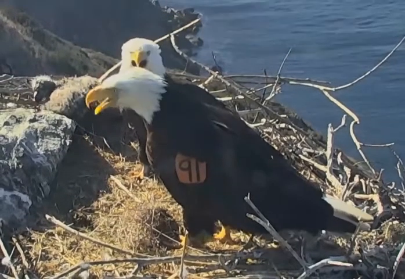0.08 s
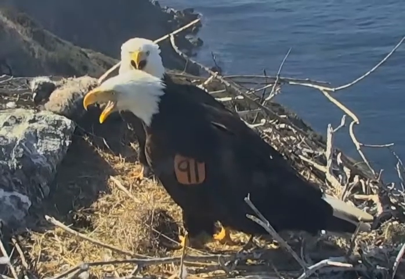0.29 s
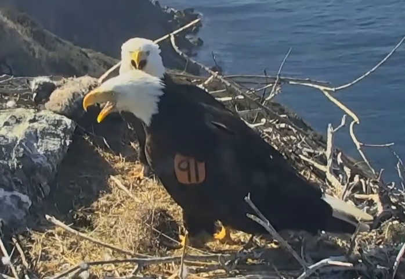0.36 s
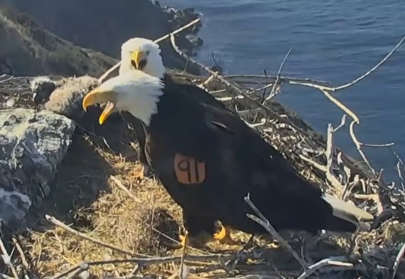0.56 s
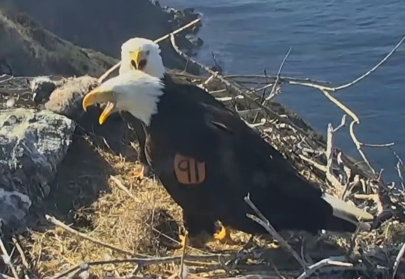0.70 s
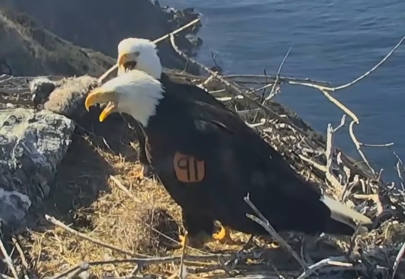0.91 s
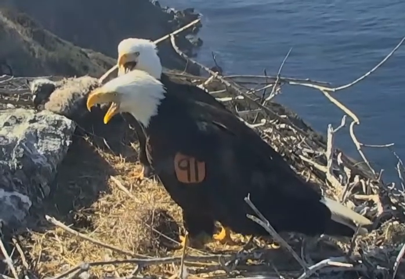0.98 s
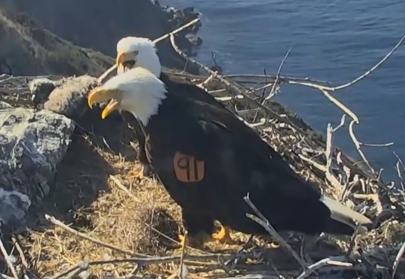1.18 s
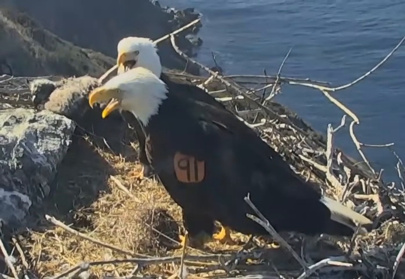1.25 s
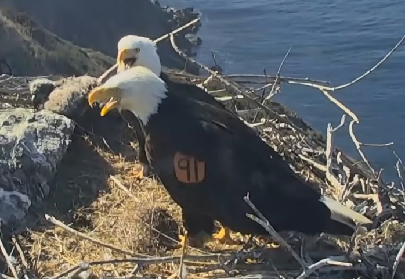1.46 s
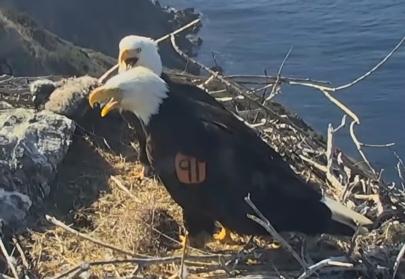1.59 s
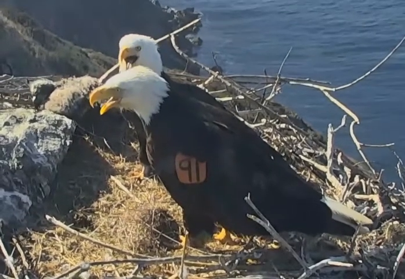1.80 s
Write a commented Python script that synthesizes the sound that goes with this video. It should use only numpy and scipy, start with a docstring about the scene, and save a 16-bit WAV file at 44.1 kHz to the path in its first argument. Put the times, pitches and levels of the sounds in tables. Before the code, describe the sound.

An eagle gives shrill, high-pitched yelps that weaken, over steady wind and distant surf.

```python
"""A cliff nest above the sea, a small microphone close to a yelping eagle, steady wind and surf behind.
Each yelp is a nearly pure whistle, most led in by a quick downward squeak; the series fades into weak,
cracked notes. Sticks and rock scatter a faint tail. At this distance the loud notes overload the
microphone, which turns them shrill and thumps after the two hardest; the sound cuts out once."""
import sys
import numpy as np
from scipy import signal
from scipy.fft import rfft, irfft
from scipy.io import wavfile
from scipy.ndimage import uniform_filter1d

SR = 44100
rng = np.random.default_rng(int(sys.argv[2]) if len(sys.argv) > 2 else 0)


def wrap_up_sound(samples):
    """Save the sound to the file named by the first command line argument, as 16-bit audio."""
    columns = np.atleast_2d(samples).T
    # keep every value between -1 and 1, then stretch to whole-number steps
    tamed = np.clip(columns, -1, 1)
    steps = np.round(tamed * 32767).astype(np.int16)
    wavfile.write(sys.argv[1], SR, steps)


N = 81585

RASP_HZ = 550  # how fast the voice wavers in pitch and level
CLIP_DB = -26  # ceiling of the microphone


def yelps(t):
    """The eagle, close up: arched, quivering whistles that crack to half the pitch as the voice weakens."""
    # One yelp a row: (start [s], attack [s], hold [s], release [s], pitch at the start [Hz],
    # after the attack [Hz], after the hold [Hz], at the end [Hz], level [dB],
    # octave [dB re the whistle], undertone [dB re the whistle], rasp [0-1])
    notes = [ (.227, 0.021, 0.026, 0.048, 2670, 2847, 2840, 2496, -19.5, -25, -70.5, 0),
             (0.348, 0.0084, .025, .028, 3520, 3575, 3600, 3330, -18.5, -8.5, -59.5, 0.06),
             (.4665, .007, .009, .011, 2800, 2970, 2945, 2820, -22, -28, -24, .1),
             (.487, .009, .007, .025, 3780, 3690, 3560, 3430, -18.5, -13, -45, .12),
             (0.8748, 0.0036, 0.03, 0.012, 2790, 2872, 2850, 2670, -22, -29.5, -53.5, 0.15),
             (1, 0.0056, 0.024, 0.017, 2747, 2835, 2780, 2740, -23, -25, -58, 0),
             (1.131, 0.0049, 0.0093, 0.014, 2800, 2830, 2780, 2660, -24, -29.5, -48.5, 0),
             (1.146, .006, .006, .019, 2730, 2715, 2700, 2620, -32, -26, -15, .04),
             (1.257, 0.0067, 0.0063, 0.016, 2760, 2750, 2677, 2500, -31.5, -33.5, -23, 0.16),
             (1.385, .005, .003, .018, 4190, 4130, 4060, 3860, -35.5, -48, -13, .04), ]
    flutter_hz, flutter_depth, jitter_depth = 59.2, 0.0072, 0.003  # depths are shares of the pitch
    first_crest_s, bloom_s, screech_db = 0.013, 0.02, -10
    out, jitter, grain = np.zeros(N), walk(RASP_HZ), walk(RASP_HZ)
    screech = noise(2, 8000)
    for start, attack, hold, release, *pitches_hz, db, octave_db, under_db, rasp in notes:
        knots = start + np.cumsum([0, attack, hold, release])
        fade = np.interp(t, knots[2:], [1, 0])
        effort = np.interp(t, knots[:2], [0, 1]) * fade ** 1.86
        flutter = flutter_depth * fade ** 2 * np.cos(2 * np.pi * flutter_hz * (t - start - first_crest_s))
        pitch_hz = np.interp(t, knots, pitches_hz) * (1 + flutter + jitter_depth * jitter)
        phase = 2 * np.pi * np.cumsum(pitch_hz) / SR
        octave = np.clip((t - start) / bloom_s, 0, 1) ** 2 * np.cos(2 * phase)  # builds up after the onset
        undertone = np.sin(phase / 2) + (pitches_hz[1] < 3000) * np.sin(1.5 * phase)
        tone = np.sin(phase) + undb(octave_db) * octave + undb(under_db) * undertone
        # Forced notes, rich in the octave, break into noise as they end.
        tone += undb(octave_db + screech_db) * np.sqrt(np.maximum(1 - fade, 0)) * screech
        roughness = 1 + (rasp + 0.19 * (1 - fade)) * grain  # raspier as the note fades
        out += undb(db) * effort * roughness * tone
    return out


def squeaks(t):
    """Brief, raspy squeaks and soft peeps, plus two faint low tones from the overloaded microphone."""
    # One glide a row: (start [s], length [s], first pitch [Hz], last pitch [Hz], level [dB])
    # The two rows below 700 Hz are the overload's difference tones.
    glides = [ (0.341, 0.016, 5270, 3300, -31), (0.391, 0.025, 2950, 2530, -37.5),
              (0.438, 0.02, 3800, 4060, -39), (0.458, 0.017, 4800, 3876, -29.5),
              (0.51, 0.0176, 2778, 2655, -33), (.516, .011, 4440, 3610, -32.5),
              (0.388, 0.015, 676, 622, -51.5), (0.502, 0.02, 682, 642, -44.5),
              (0.533, 0.018, 3980, 3980, -36.5), (0.8673, 0.0079, 4980, 3290, -31),
              (.989, 0.0089, 4600, 3230, -34.5), (.998, 0.0066, 3680, 3540, -29),
              (1.084, 0.014, 12600, 8000, -70), (1.089, .014, 5080, 2960, -40),
              (1.097, .017, 3780, 4080, -48), (1.115, 0.011, 4300, 3250, -35.5),
              (1.126, 0.0084, 3600, 3430, -34), (1.163, 0.0069, 1327, 1060, -41.5),
              (1.193, 0.015, 12500, 8000, -75), (1.199, 0.014, 5240, 3000, -42.5),
              (1.209, .013, 3750, 4180, -44.5), (1.26, 0.0064, 4400, 4180, -38.5),
              (1.26, 0.016, 3500, 3340, -39), (1.283, 0.012, 1175, 1074, -42),
              (1.301, 0.0089, 4920, 3670, -45.5), (1.532, 0.0055, 5000, 4170, -64),
              (1.644, 0.005, 4440, 3650, -47), ]
    out = np.zeros(N)
    grain = 1 + 0.17 * walk(RASP_HZ)
    jitter = 1 + 0.012 * walk(RASP_HZ)
    scratch = undb(-20.5) * noise(3, 4000)
    for start, length, first_hz, last_hz, db in glides:
        progress = np.clip((t - start) / length, 0, 1)
        pitch_hz = (first_hz + (last_hz - first_hz) * progress) * jitter
        phase = 2 * np.pi * np.cumsum(pitch_hz) / SR
        swell = np.sin(np.pi * progress ** 1.52)
        out += undb(db) * swell * (grain * np.sin(phase) + scratch)
    return out


def hiss(voice):
    """Faint high hiss that rises with the loud notes."""
    high_noise = noise(2, [2500, 12800], "bandpass")
    return undb(-38.5) * np.abs(voice).max() * strength(voice) ** 1.4 * high_noise


def nest(voice, t):
    """Sticks and rock around the bird scatter its voice into a short, faint, dull tail."""
    t60_s = 0.17
    tail = rng.standard_normal(N) * np.exp(-np.log(1000) * t / t60_s)
    dull = signal.sosfilt(signal.butter(6, 4300, fs=SR, output="sos"), voice)
    return undb(-23) * signal.fftconvolve(dull, tail / np.linalg.norm(tail))[:N]


def gust(t):
    """One soft, low puff of wind on the microphone."""
    at_s, width_s, hz = 0.0233, 0.009, 95
    return undb(-43) * bump(t, at_s, width_s) * np.sin(2 * np.pi * hz * (t - at_s))


def surf():
    """Wind and distant surf: octave bands of noise that swell together and flicker alone."""
    # Spectrum of the wind and surf: (frequency [Hz], relative level per hertz [dB])
    contour = [(25, -3.5), (70, -5.5), (135, -1), (280, -6.5), (480, -13.5), (700, -14), (1080, -7.5),
               (1400, -20), (1750, -25.5), (2100, -29), (2500, -14), (3100, -19), (4000, -18.5),
               (4700, -32.5), (5500, -42.5), (8000, -52), (15000, -60)]
    contour_hz, contour_db = np.array(contour).T
    hz = np.maximum(np.arange(N // 2 + 1) * SR / N, 1)
    spectrum = rfft(rng.standard_normal(N)) * undb(np.interp(np.log(hz), np.log(contour_hz), contour_db))
    octave = np.floor(np.log2(hz))
    out, swell_db = np.zeros(N), 0.4 * walk(9)
    for k in np.unique(octave):
        flicker_db = 0.9 * walk(39)
        out += irfft(spectrum * (octave == k), N) * undb(swell_db + flicker_db)
    return undb(-52.5) * unit(out)


def overload(dry):
    """The microphone flattens loud peaks, a little more on one side than the other."""
    hardness, bias, oversample = 8.7, 0.095, 4
    drive = signal.resample_poly(dry, oversample, 1, axis=1) / undb(CLIP_DB) + bias
    flat = drive / (1 + np.abs(drive) ** hardness) ** (1 / hardness) - bias
    return undb(CLIP_DB) * signal.resample_poly(flat, 1, oversample, axis=1)


def thumps(t):
    """The recovering microphone's offset sags, creeps up while the gain is choked, jumps and falls back."""
    # Thumps after the two hardest overloads: (time [s], level [dB])
    recoveries = [(0.416, -25), (0.518, -33)]
    creep_s, jump_s, fall_s, choke_s = 0.0059, 0.00088, 0.0082, 0.0072
    offset, gain = np.zeros(N), np.ones(N)
    for at, db in recoveries:
        before, after = np.maximum(at - t, 0), np.maximum(t - at, 0)
        sag = undb(-35) * bump(t, at - 0.02, width_s=0.0075)
        rise = 0.55 * np.exp(-before / creep_s) + 0.45 * bump(before, 0, jump_s)
        offset += undb(db) * rise * np.exp(-after / fall_s) - sag
        choke_depth = min(undb(db - CLIP_DB) ** 2, 1)
        gain *= 1 - choke_depth * bump(t, at - choke_s, choke_s)
    return offset, gain


def undb(db):
    """Decibels to gain."""
    return 10 ** (np.asarray(db) / 20)


def unit(x):
    """Scale to rms 1."""
    return x / np.sqrt(np.mean(x ** 2))


def bump(t, at_s, width_s):
    """Bell curve of height 1."""
    return np.exp(-((t - at_s) / width_s) ** 2)


def noise(order, edge_hz, kind="lowpass"):
    """Filtered white noise of rms 1."""
    band = signal.butter(order, edge_hz, kind, fs=SR, output="sos")
    return unit(signal.sosfilt(band, rng.standard_normal(N)))


def walk(rate_hz):
    """Smooth random wander of rms 1, changing about rate_hz times a second."""
    hz = np.arange(N // 2 + 1) * SR / N
    return unit(irfft(rfft(rng.standard_normal(N)) / (1 + (hz / rate_hz) ** 4), N))


def strength(x):
    """Amplitude smoothed over 3 ms, 1 at the loudest moment."""
    level = uniform_filter1d(np.abs(x), size=132)
    return np.maximum(level / level.max(), 0)


def scene():
    """The bird close by, the sea far off, in mono."""
    t = np.arange(N) / SR
    voice = yelps(t) + squeaks(t)
    return (voice + hiss(voice) + nest(voice, t) + surf() + gust(t))[None]


def record(dry):
    """The microphone overloads, thumps and rumbles under loud notes; one dropout; the top is cut."""
    dropout_start_s, dropout_end_s, top_hz = 0.5757, 0.8575, 15800
    t = np.arange(N) / SR
    offset, gain = thumps(t)
    rumble = undb(-56.5) * strength(dry[0]) * walk(rate_hz=90)
    heard = gain * overload(dry) + offset + rumble
    live = (t < dropout_start_s) | (t > dropout_end_s)
    gate = uniform_filter1d(live.astype(float), size=44)  # 1 ms edges
    top_cut = signal.ellip(10, 0.2, 70, top_hz, fs=SR, output="sos")
    return signal.sosfilt(top_cut, heard * gate)


dry = scene()
out = record(dry)
wrap_up_sound(out)
```